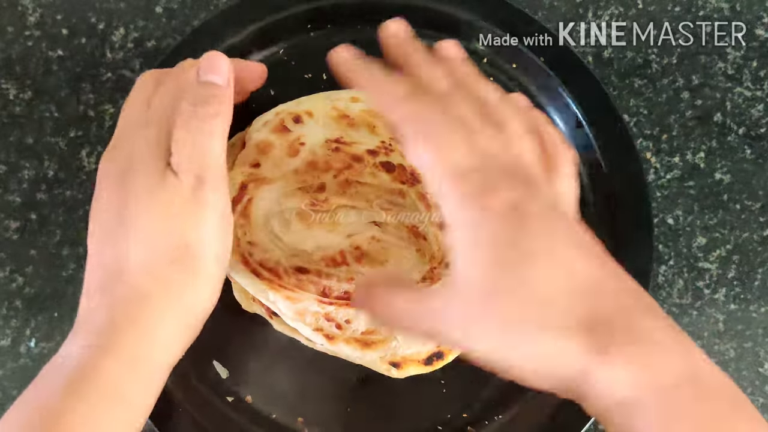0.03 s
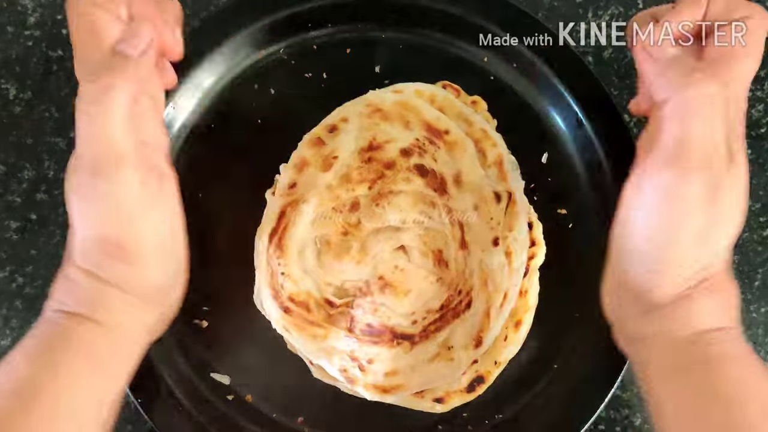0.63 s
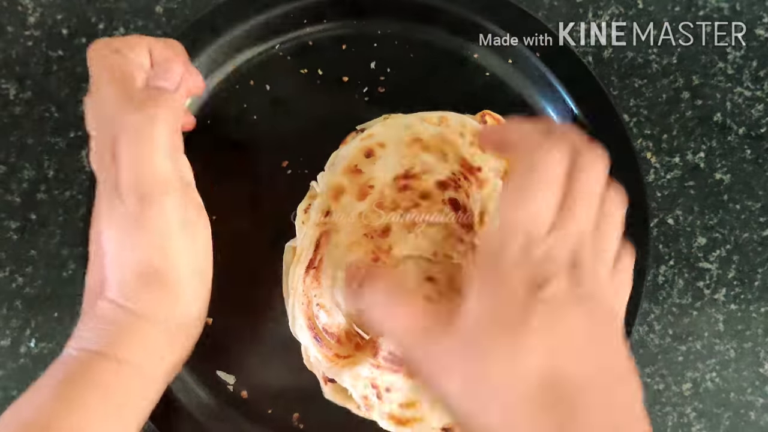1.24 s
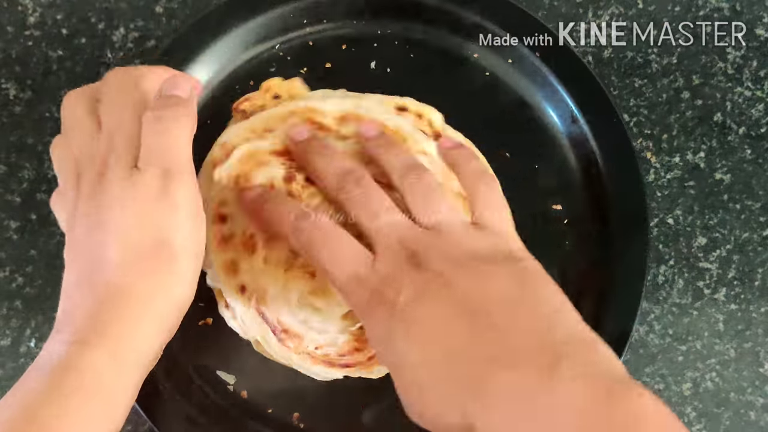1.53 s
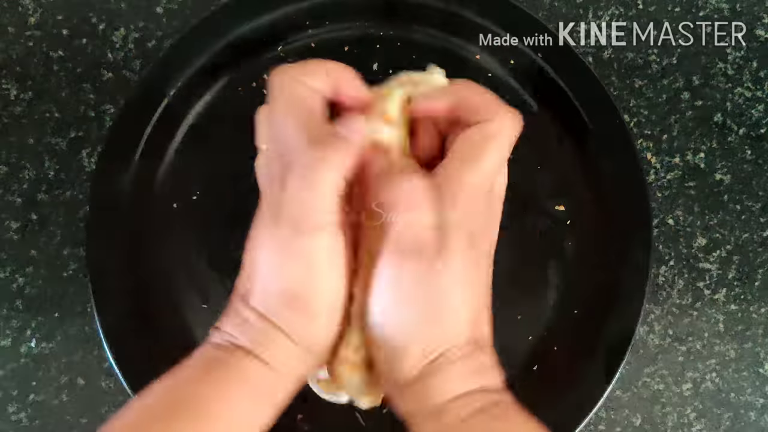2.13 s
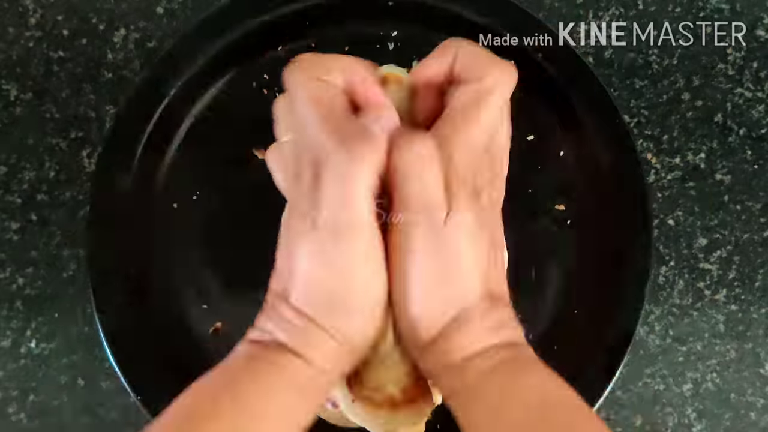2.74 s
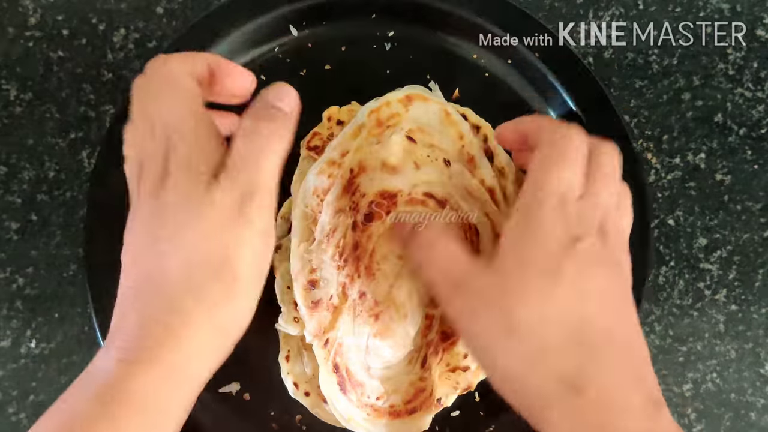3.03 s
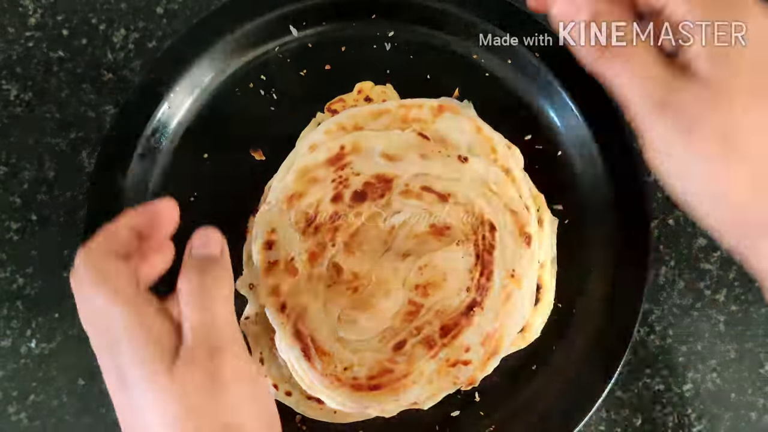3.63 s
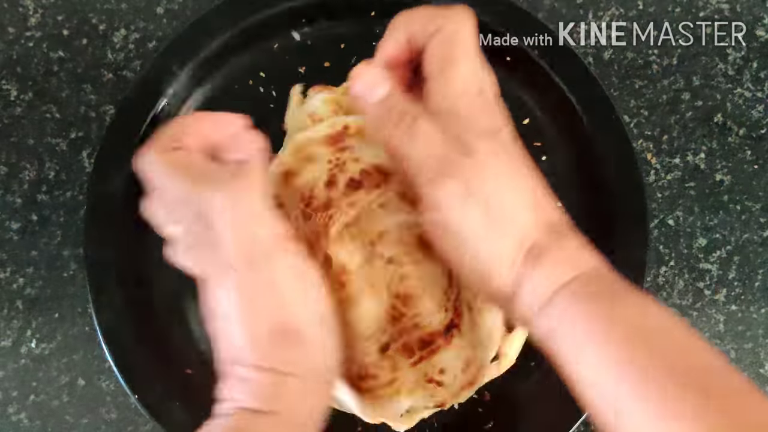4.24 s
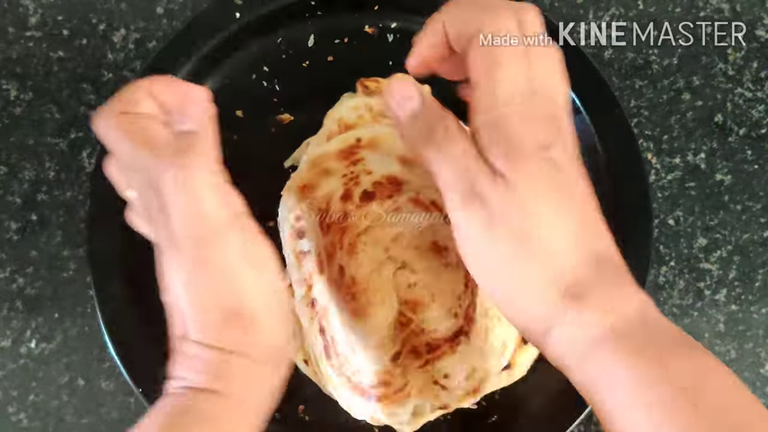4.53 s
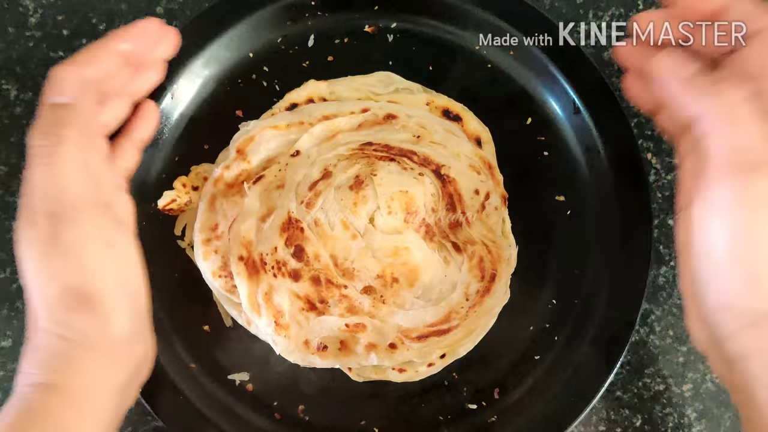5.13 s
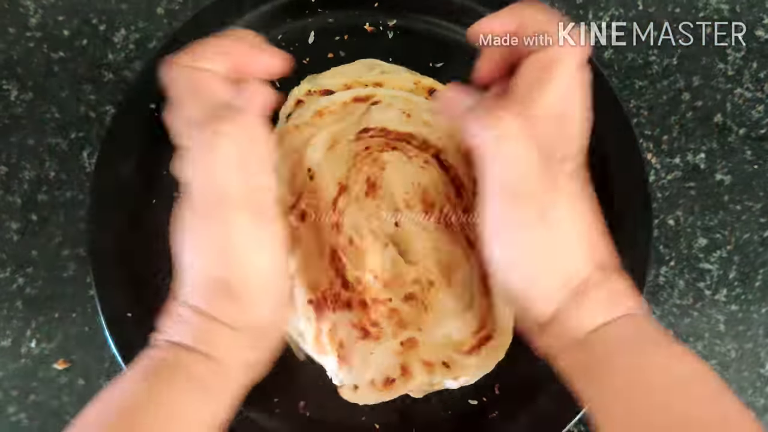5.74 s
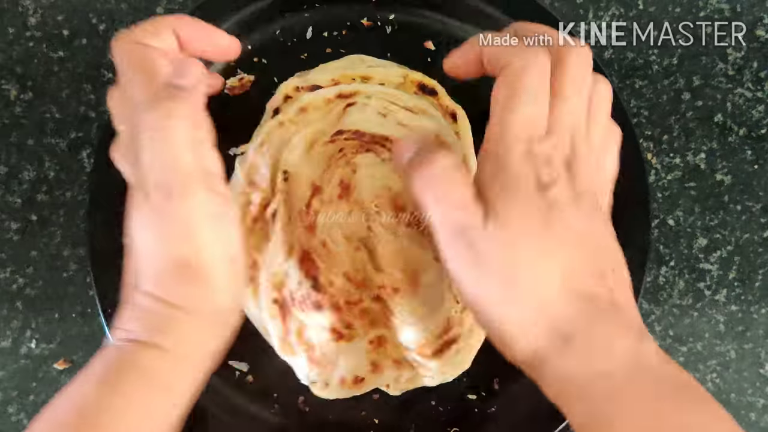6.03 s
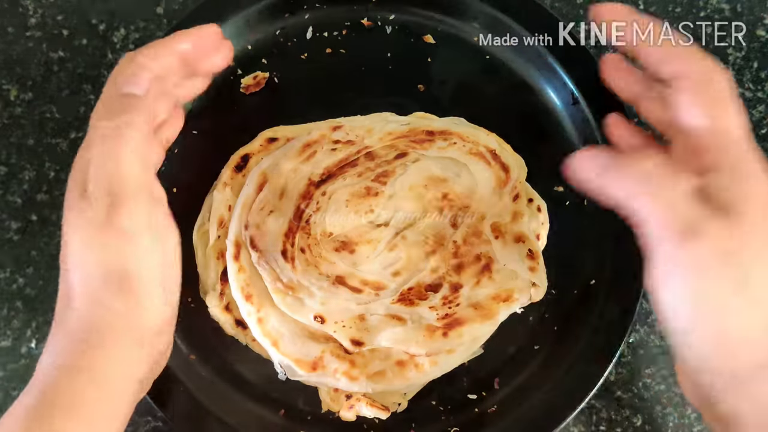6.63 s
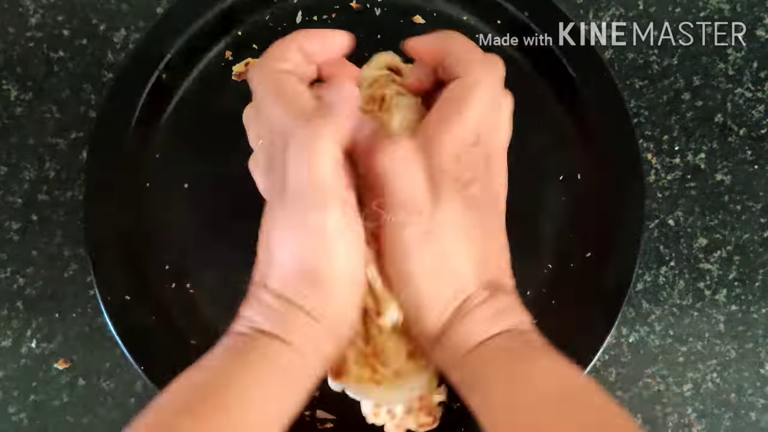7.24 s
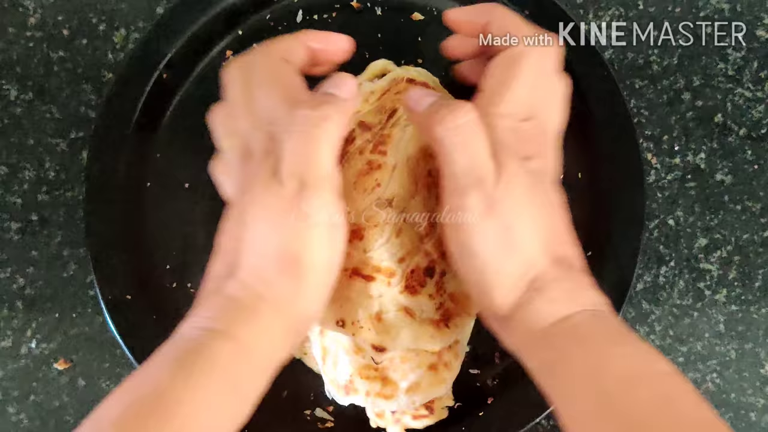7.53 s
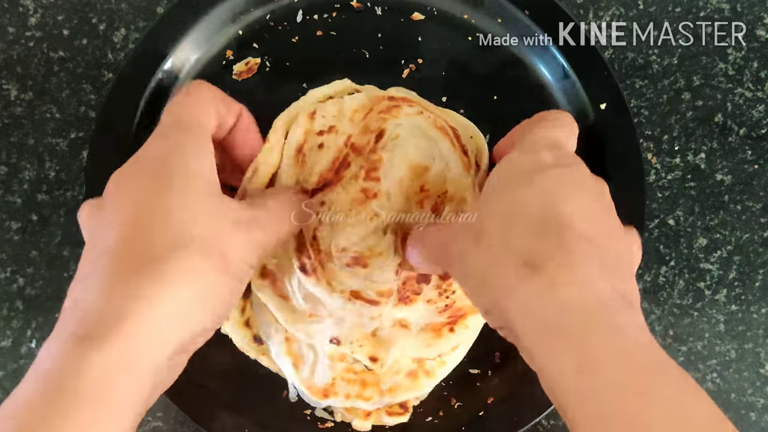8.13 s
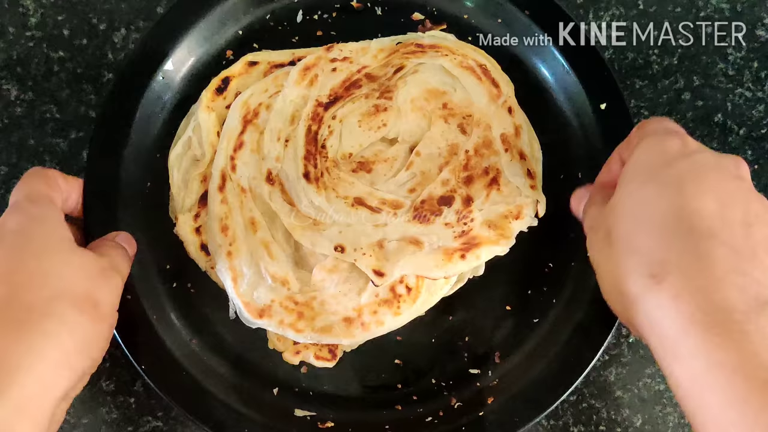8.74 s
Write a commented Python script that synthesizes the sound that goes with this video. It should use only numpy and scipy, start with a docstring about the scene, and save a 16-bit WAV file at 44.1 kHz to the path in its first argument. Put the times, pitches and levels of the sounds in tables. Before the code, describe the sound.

Two hands clap a stack of flatbreads on a plate in a small, hard-walled kitchen. The blows come in five quick groups of about three, each a moist smack, often with a hollow pop of squeezed air. Between groups the crust rustles and crackles softly, and the stack sometimes flops back, rocking the plate. A motor hums low and water drips occasionally. The microphone is close and overloads on the hardest hits.

```python
"""In a small, hard-walled kitchen, two hands clap a stack of hot flatbreads on a plate on a stone counter.
The blows fall in five groups of three. Each impact is a moist smack, often followed by the hollow pop
of air squeezed out between palms and bread. The crust rustles, and the stack flops back and rocks the
plate. The room reverberates, a motor hums, water drips now and then; the close microphone overloads."""
import sys
import numpy as np
from scipy import signal
from scipy.fft import rfft, irfft, next_fast_len
from scipy.io import wavfile

SR = 44100
rng = np.random.default_rng(int(sys.argv[2]) if len(sys.argv) > 2 else 0)


def wav_out(sig):
    """Save sig, one row per channel (or a flat mono array), as 16-bit PCM at SR to the path in sys.argv[1]."""
    wavfile.write(sys.argv[1], SR, np.round(np.clip(np.atleast_2d(sig).T, -1, 1) * 32767).astype(np.int16))


N = 387629
TIME = np.arange(N) / SR

# partials of the motor: (frequency [Hz], rms level [dB])
MOTOR_PARTIALS = [(59.2, -47.5), (107.7, -48.5), (183, -51), (306.8, -54)]
# spectra of room air, dry crust and moist bread: (frequency [Hz], relative spectral density [dB])
AIR_SPECTRUM = [(20, -1), (55, 2), (130, -1), (185, -2.5), (255, -25.5), (340, -3.5), (600, -10),
                (1000, -17.5), (2000, -30.5), (4000, -38), (16000, -43)]
RUSTLE_SPECTRUM = [(100, 1), (400, 8), (700, 6.5), (1200, -1), (2500, -4), (8000, -6), (16000, 0.5)]
SMACK_SPECTRUM = [(40, -8), (130, -0.5), (260, -13), (350, -1), (560, 1), (1100, -1.5), (1500, -1.5),
                  (2300, -4), (3500, -7.5), (4600, -12), (8000, -12.5), (16000, -13.5)]
# reflections from counter and walls: (left delay [ms], right delay [ms], gain [dB])
EARLY_ECHOES = [(1.95, 1.7, -14), (3.55, 3.4, -9), (5.4, 5.45, -13), (8.25, 11, -15.5), (10.6, 12, -8),
                (15.1, 5.4, -9), (16.95, 16.85, -8)]
# diffuse field: (frequency [Hz], level [dB], T60 [s], left-right coherence [0..1])
REVERB_BANDS = [(100, -8.5, 0.94, 0.87), (258, 0, 0.86, 0.95), (570, 1, 0.5, 0.21), (1030, -3, 0.57, 0),
                (2060, -2, 0.44, 0), (5400, -0.5, 0.52, 0), (14000, -3.5, 0.34, 0)]
# modes of kitchen and counter: (frequency [Hz], gain [dB], T60 [s])
STANDING_WAVES = [(107.95, 15.5, 0.49), (124.4, 12.5, 0.35), (190.3, 17, 0.28), (336.2, 9.5, 0.28),
                  (394.5, 8, 0.25), (455.3, 5, 0.12), (539, 6.5, 0.91), (592, -11.5, 0.16),
                  (759, 7.5, 0.18), (1020, 0, 0.27), (1055, 1, 0.074), (1455, 4.5, 0.079),
                  (1500, -36, 0.19), (1940, 1.5, 0.024), (2284, 7, 0.061), (2850, -31, 0.02)]
# water falling nearby: (time [s], bubble frequency [Hz], level [dB])
WATER_DROPS = [(.152, 1250, -27.5), (.162, 2800, -38), (2.986, 1520, -32), (3.163, 1230, -24.5),
               (6.724, 970, -30.5), (8.643, 1233, -26)]
# a hand slides over the bread: (time of firmest pressure [s], level [dB], swell time [s])
HAND_RUBS = [(0, -40, 0.31), (1.03, -43.5, 0.22), (1.56, -39.5, .13), (2.37, -40.5, 0.17),
             (3.27, -40, 0.18), (3.5, -40.5, 0.08), (4.1, -43.5, 0.27), (4.87, -38.5, 0.09),
             (5.92, -35, 0.23), (6.35, -40.5, .18), (7.9, -44.5, 0.3), (8.68, -41, 0.15)]
# fingertips tap and snap the crust: (time [s], level [dB], centre frequency [Hz], decay time [ms])
CRUST_SNAPS = [(0.022, -27.5, 3700, 3.3), (.31, -35, 3520, 8), (.353, -28, 9600, 4.3),
               (1.521, -29.5, 840, 8.3), (3.33, -31.5, 590, 7.5), (3.538, -27, 2420, 4),
               (3.553, -24.5, 1570, 4.4), (6.297, -30, 2080, 2.7), (6.656, -33.5, 6040, 4),
               (6.767, -31.5, 1310, 3), (7.142, -31.5, 4000, 4), (7.753, -31.5, 5780, 6.4),
               (8.087, -28.5, 1350, 3), (8.247, -35.5, 1390, 3.4), (8.548, -25, 2750, 4.4),
               (8.604, -8, 9600, 4.8)]
# resonances of the plate: (frequency [Hz], level [dB], T60 [s])
PLATE_MODES = [(354, -10.5, 0.073), (532, -15, 0.19), (650, -4, 0.099), (792, -7, 0.043), (828, -6, 0.07),
               (1035, -2, 0.066), (1083, -8.5, 0.14)]
# the stack flops back on the plate: (time [s], level [dB])
STACK_FLOPS = [(.922, -17.5), (1.115, -15), (1.185, -16), (2.31, -26), (4.05, -19.5), (4.33, -30),
               (4.576, -17.5), (5.815, -15), (6.121, -30.5)]
# trapped air escapes and the hands close the gap: (time [s], level [dB], frequency [Hz], thud level [dB])
AIR_BURSTS = [(.479, 2, 774, -4.5), (.775, -5.5, 786, -19), (.815, 5, 900, -4.5), (1.084, 6, 920, -8.5),
              (2.169, -2, 780, -15), (2.209, -5, 860, -7.5), (2.824, -4, 744, -4.5), (3.937, 5.5, 960, -12),
              (3.957, 2.5, 820, -11), (4.238, 4, 736, -2.5), (4.476, 4.5, 870, -6), (5.432, 2, 666, -3.5),
              (5.728, 5, 835, -15), (5.949, -3, 880, -20), (5.998, 2, 910, -27), (6.997, 1.5, 800, -17),
              (7.004, -1.5, 643, -3.5), (7.304, -1.5, 696, -2.5), (7.349, -1.5, 930, -4),
              (7.564, 5, 1130, -3.5), (7.601, -2.5, 920, -25)]
# a hand lands: (time of fullest contact [s], level [dB], contact decay time [ms],
# relative level of the palm's ring [dB], its frequency [Hz])
HAND_BLOWS = [(.465, -5, 12.7, -7, 1500), (.802, -7, 7.7, -2, 1486), (1.066, -23, 22, -11, 1510),
              (1.087, -5, 2.7, -12, 1040), (2.149, -19.5, 3.3, -12, 2000), (2.184, -4.5, 5.3, 0.5, 2010),
              (2.211, -8.5, 3.8, -14, 2000), (2.521, -12, 15.8, -6.5, 1870), (2.786, -13.5, 3.5, -2, 1540),
              (2.801, -13, 9.6, -15.5, 1500), (3.901, -7, 5.4, 1.5, 1880), (3.957, -13, 5.5, 0, 1024),
              (4.21, -8.5, 7.2, 2.5, 1830), (4.457, -3.5, 3.6, -4, 1860), (5.368, -30.5, 5.7, 21, 750),
              (5.406, -9, 6.2, -18, 1900), (5.703, 0, 3.2, -2.5, 2440), (5.798, -13, 14, 6.5, 810),
              (5.957, -6, 4.6, -3, 2260), (6.0, -8, 2.2, -8, 2160), (6.011, -3, 7.2, -1, 1576),
              (6.561, -15.5, 1.56, 4.5, 660), (6.943, -10, 1.9, 6, 740), (6.958, -9, 15, 1.5, 2330),
              (7.275, -14, 7.2, -19, 1600), (7.293, -19, 10.4, -19, 1600), (7.352, -14, 4.4, 8, 2200),
              (7.528, -14.5, 10, -15.5, 1920), (7.608, -10.5, 3.8, 9.5, 2176),
              (7.617, -10.5, 10, 8.5, 1534), (8.594, -25, 8.2, 9, 1425)]


def from_db(db):
    """Amplitude grows tenfold for every 20 dB."""
    return 10 ** (np.asarray(db) / 20)


def butter(x, hz, kind, order=2):
    """A causal low- or high-pass filter attenuates one side of its corner frequency."""
    return signal.sosfilt(signal.butter(order, min(hz, .45 * SR), kind, fs=SR, output="sos"), x + 1e-18)


def shelf(x, hz, treble_db):
    """A shelving filter scales the spectrum above its corner frequency."""
    dull = butter(x, hz, "low", order=1)
    return dull + from_db(treble_db) * (x - dull)


def resonate(x, hz, width_hz):
    """A driven, damped oscillator responds with unit gain at resonance."""
    radius = np.exp(-np.pi * width_hz / SR)
    feedback = [1, -2 * radius * np.cos(2 * np.pi * hz / SR), radius ** 2]
    return signal.lfilter(np.array([1, 0, -1]) * (1 - radius ** 2) / 2, feedback, x + 1e-18)


def noise(spectrum):
    """Spectral weighting turns white noise into coloured noise of unit rms."""
    hz, db = np.transpose(spectrum)
    size = next_fast_len(N)
    bins_hz = np.maximum(np.fft.rfftfreq(size, 1 / SR), 1)
    gain = from_db(np.interp(np.log(bins_hz), np.log(hz), db))
    x = irfft(rfft(rng.standard_normal(size)) * gain)[:N]
    return x / x.std()


def wander(step):
    """Linear interpolation joins random values `step` samples apart."""
    count = N // step + 2
    return np.interp(np.arange(N) / step, np.arange(count), rng.standard_normal(count))


def grain(spread_db, step):
    """Rough surfaces touch patch by patch, giving an uneven gain of unit rms."""
    gain = from_db(spread_db * wander(step))
    return gain / np.sqrt(np.mean(gain ** 2))


def around(s):
    """A transient occupies a short span of samples; t is their time relative to the moment s."""
    span = slice(max(int((s - .06) * SR), 0), min(int((s + .25) * SR), N))
    return span, TIME[span] - s


def contact(t, closing_s, fading_s):
    """A soft contact builds to its fullest at t = 0, then relaxes exponentially."""
    return np.exp(np.where(t < 0, -(t / closing_s) ** 2, -t / fading_s))


def push(t, decay_s=0.0013):
    """A dull shove radiates a compression, and its recoil a rarefaction."""
    age = np.maximum(t, 0) / decay_s
    return age * (2 - age) * np.exp(-age)


def background(air_db=-44, side_db=-9, hiss_db=-59, waver=0.1):
    """Slow amplitude and phase modulation makes a motor's hum waver amid air noise and hiss."""
    hum = 0
    for hz, db in MOTOR_PARTIALS:
        drift = wander(step=10000)
        hum += from_db(db) * np.sqrt(2) * (1 + waver * drift) * np.sin(2 * np.pi * hz * TIME + drift / 2)
    side = from_db(side_db) * butter(noise(AIR_SPECTRUM), 133, "high", order=1)
    air = noise(AIR_SPECTRUM) + side * [[1], [-1]]
    return hum + from_db(air_db) * air + from_db(hiss_db) * rng.standard_normal((2, N))


def room_response(scatter_db=-7, scatter_s=0.0064, build_s=0.0008):
    """Reflection gives early echoes, scatter from hands and utensils, and a decaying diffuse field."""
    t = TIME[:int(.7 * SR)]
    response = np.zeros((2, len(t)))
    for *delays_ms, db in EARLY_ECHOES:
        for ear, ms in enumerate(delays_ms):
            response[ear] += from_db(db) * np.sinc((t - ms / 1000) * SR / 2) / 2
    scatter = butter(rng.standard_normal(response.shape), 1030, "high") * np.exp(-t / scatter_s)
    response += from_db(scatter_db) * np.sqrt(2 / (scatter_s * SR)) * scatter
    edges_hz = np.geomspace(60, 17000, 13)
    hz, *columns = np.transpose(REVERB_BANDS)
    white = rng.standard_normal((2, 2, len(t)))
    for k, band in enumerate(zip(edges_hz, edges_hz[1:])):
        db, t60, coherence = [np.interp(np.log(band).mean(), np.log(hz), column) for column in columns]
        mid, side = signal.sosfilt(signal.butter(2, band, "band", fs=SR, output="sos"), white[k % 2])
        tail = np.sqrt(1 + coherence) * mid + np.sqrt(1 - coherence) * side * [[1], [-1]]
        damping = np.log(1000) / t60
        envelope = np.exp(-damping * t) * (1 - np.exp(-t / build_s))
        response += from_db(db) * np.sqrt(damping / SR) * tail * envelope
    return response


def kitchen(x, room_db=0, modes_db=-3, blur_samples=1.54):
    """Direct sound, reflections and standing waves add by superposition."""
    reflected = signal.fftconvolve(x[None], room_response(), axes=1)[:, :N]
    # paths past the moving hands keep changing, which blurs the treble of the reflections
    index = np.arange(N)
    blurred = np.array([np.interp(index + blur_samples * wander(step=110), index, ear)
                        for ear in reflected])
    standing = sum(from_db(db + modes_db) * resonate(x, hz, np.log(1000) / (np.pi * t60))
                   for hz, db, t60 in STANDING_WAVES)
    return x + from_db(room_db) * (blurred + standing)


def drips(swell_s=0.0097, rise_per_s=0.35, level_db=-6.5, flutter_cycles=0.15):
    """Each drop traps a bubble, whose resonance gives an unsteady, slightly rising note."""
    out = np.zeros(N)
    jitter = 2 * np.pi * flutter_cycles * wander(step=160)
    for s, hz, db in WATER_DROPS:
        span, t = around(s)
        t = np.maximum(t, 0)
        note = np.sin(2 * np.pi * hz * t * (1 + rise_per_s * t) + jitter[span])
        out[span] += from_db(db + level_db) * t / swell_s * np.exp(1 - t / swell_s) * note
    return out


def crust(resting_db=-47.5, rustle_db=-1, crackles_per_s=65, crackle_db=5, snap_db=3):
    """Friction rustles and fracture crackles, both louder under firmer rubbing; a few flakes snap."""
    rub_power = sum((from_db(db) * np.exp(-((TIME - s) / swell_s) ** 2 / 2)) ** 2
                    for s, db, swell_s in HAND_RUBS)
    firmness = np.sqrt(from_db(resting_db) ** 2 + rub_power)
    fractures = (rng.random(N) < crackles_per_s / SR) * from_db(rng.normal(crackle_db, 4, N))
    rustle = from_db(rustle_db) * noise(RUSTLE_SPECTRUM) * grain(spread_db=4, step=70)
    out = firmness * (rustle + butter(fractures, 4000, "high", order=1))
    white = rng.standard_normal(N)
    for s, db, hz, ms in CRUST_SNAPS:
        span, t = around(s)
        burst = (t >= 0) * np.exp(-np.abs(t) * 1000 / ms) * white[span]
        snap = resonate(burst, hz, width_hz=0.75 * hz)
        out[span] += from_db(db + snap_db) * snap / np.abs(snap).max()
    return out


def plate(rocks=3, gap_s=0.024, loss_db=5.5, spread_db=1.6):
    """Each flop rocks the plate; every weaker touch excites its damped modes in a new balance."""
    out = np.zeros(N)
    touches = [(s + gap_s * k * rng.uniform(.85, 1.15), db - loss_db * k)
               for s, db in STACK_FLOPS for k in range(rocks)]
    for s, db in touches:
        span, t = around(s)
        t = np.maximum(t, 0)
        for k, (hz, mode_db, t60) in enumerate(PLATE_MODES):
            amplitude = (-1) ** k * from_db(db + mode_db + rng.normal(0, spread_db))
            out[span] += amplitude * np.exp(-np.log(1000) * t / t60) * np.sin(2 * np.pi * hz * t)
    return out


def cupped_palms(swell_s=0.00056, ring_s=0.003, contact_share=0.24, level_db=-3, flutter=0.11):
    """Cavity resonance: air in a cupped hand rings at two unsteady notes, longer after a slow landing."""
    out = np.zeros(N)
    for ratio, mode_db in ((1, 0), (1.42, -13)):
        jitter = np.pi * flutter * noise([(100, 6), (400, -8), (1200, -45)])
        for s, db, ms, cup_db, hz in HAND_BLOWS:
            span, t = around(s)
            t = np.maximum(t, 0)
            envelope = (1 - np.exp(-t / swell_s)) * np.exp(-t / (ring_s + contact_share * ms / 1000))
            note = np.sin(2 * np.pi * ratio * hz * t + jitter[span])
            out[span] += from_db(db + cup_db + mode_db + level_db) * envelope * note
    return out


def pops(swell_cycles=0.45, level_db=1):
    """The air pocket between the palms oscillates for about one cycle: rarefaction, then compression."""
    out = np.zeros(N)
    for s, db, hz, _ in AIR_BURSTS:
        span, t = around(s)
        cycles = t * hz - .5
        envelope = np.exp(-(cycles / swell_cycles) ** 2)
        out[span] += from_db(db + level_db) * envelope * np.sin(2 * np.pi * cycles)
    return out


def smacks(squash_db=-25, cushioning=0.78, spray_db=-17.5, thud_delay_s=0.0041, flop_db=-6.5):
    """Soft impact: the moist layers hiss and thud as a hand lands, air bursts out or the stack flops."""
    wet = noise(SMACK_SPECTRUM) * grain(spread_db=3, step=24)
    smack = shelf(wet, 3000, treble_db=-1)
    spray = shelf(wet, 3000, treble_db=-5)
    flop = shelf(wet, 900, treble_db=-8)
    out = np.zeros(N)
    for s, db, ms, cup_db, _ in HAND_BLOWS:
        span, t = around(s)
        fading_s = ms / 1000
        touch = contact(t, 0.72 * fading_s, fading_s) + from_db(squash_db) * contact(t, 0.0078, 0.03)
        # slow landings push more; the air in a cupped palm cushions the push
        push_db = -10.5 + 8.5 * np.log2(ms / 7) - cushioning * cup_db
        out[span] += from_db(db) * (touch * smack[span] + from_db(push_db) * push(t))
    for s, db, _, thud_db in AIR_BURSTS:
        span, t = around(s)
        out[span] += from_db(db + spray_db) * contact(t, 0.0018, 0.01) * spray[span]
        out[span] += from_db(thud_db) * push(t - thud_delay_s)
    for s, db in STACK_FLOPS:
        span, t = around(s)
        out[span] += from_db(db + flop_db) * contact(t, 0.0039, 0.057) * flop[span]
        out[span] += from_db(db - 1) * push(t)
    return out


def scene(hand_db=-6.5, hand_pan_db=2.0, drip_room_db=-7):
    """Level differences place a hand on each side, each with its own room path; the bread lies between."""
    pan = from_db(hand_pan_db * np.array([[1], [-1]]))
    left_hand = kitchen(smacks()) * pan
    right_hand = kitchen(smacks()) / pan
    water = drips()
    middle = pops() + cupped_palms() + plate() + crust() + from_db(drip_room_db) * water
    return from_db(hand_db) * (left_hand + right_hand) + kitchen(middle, room_db=1) + water + background()


def record(dry, left_port_db=9, right_port_db=10, drive_db=-1, cutoff_hz=15600):
    """Each microphone port has its own treble resonance; overload clips the hardest blows."""
    left, right = dry
    left = butter(left + from_db(left_port_db) * resonate(left, 6116, 554), 7950, "low")
    right = butter(right + from_db(right_port_db) * resonate(right, 9570, 1140), 11600, "low", order=1)
    clipped = np.clip(from_db(drive_db) * np.array([left, right]), -1, 1)
    return signal.sosfilt(signal.ellip(10, .1, 70, cutoff_hz, fs=SR, output="sos"), clipped)


dry = scene()
out = record(dry)
wav_out(out)
```